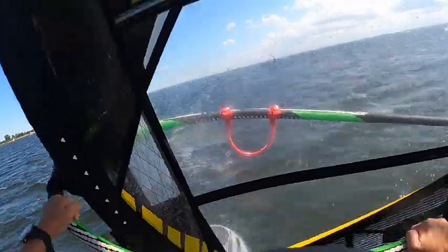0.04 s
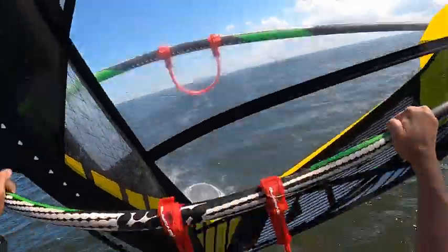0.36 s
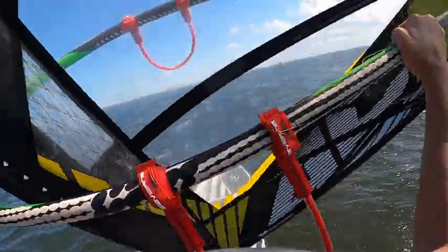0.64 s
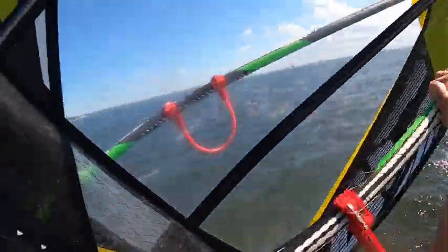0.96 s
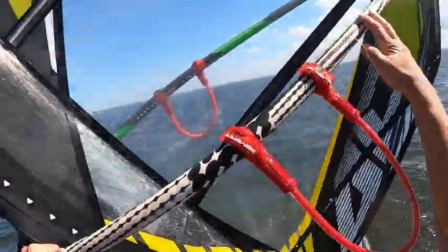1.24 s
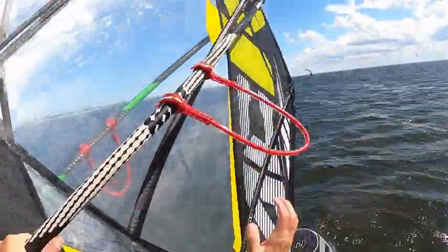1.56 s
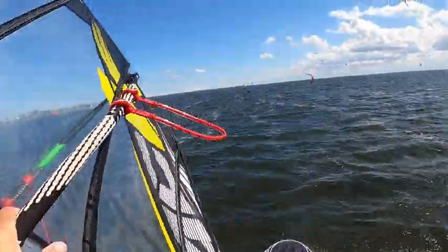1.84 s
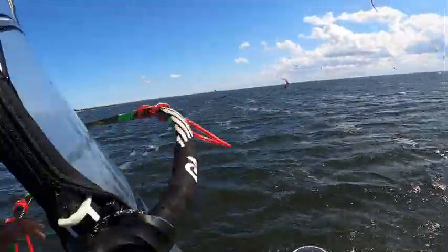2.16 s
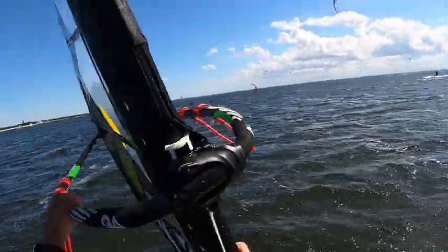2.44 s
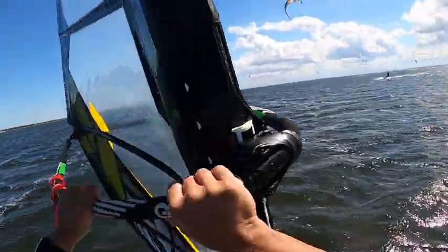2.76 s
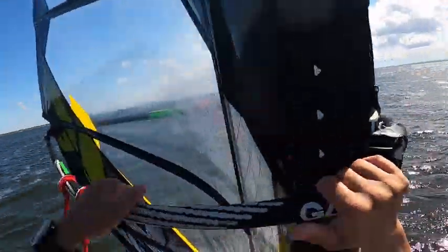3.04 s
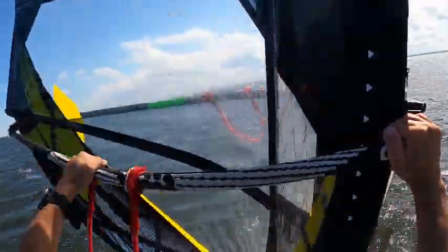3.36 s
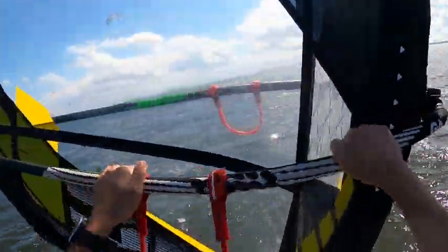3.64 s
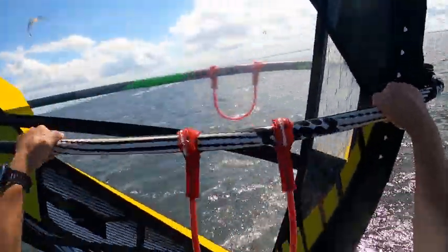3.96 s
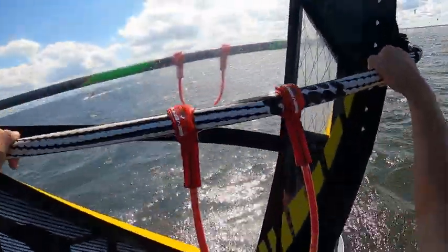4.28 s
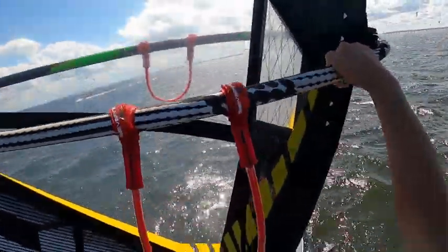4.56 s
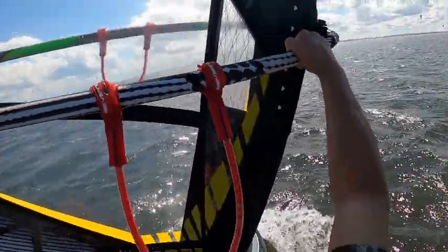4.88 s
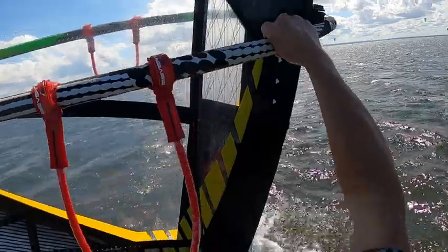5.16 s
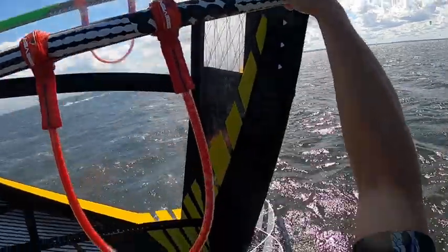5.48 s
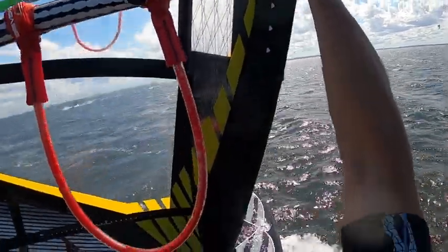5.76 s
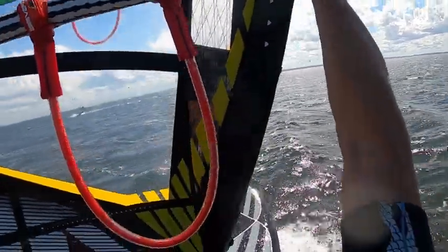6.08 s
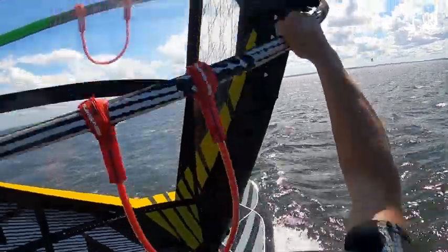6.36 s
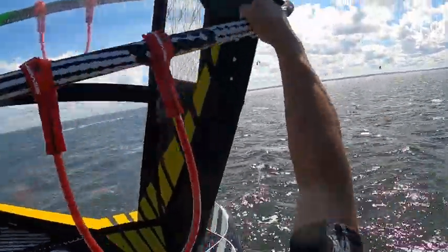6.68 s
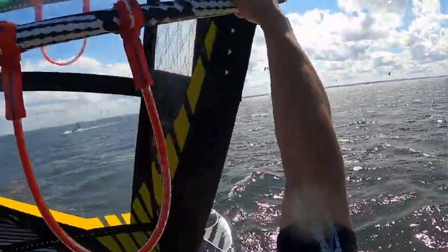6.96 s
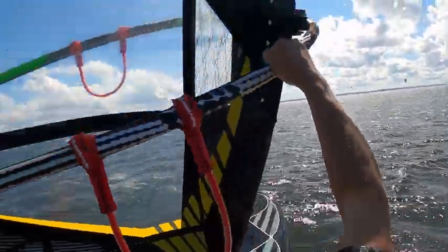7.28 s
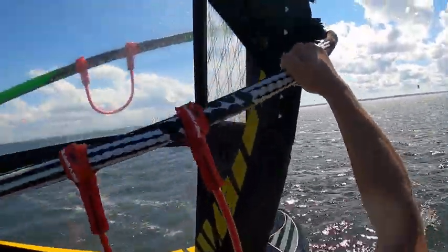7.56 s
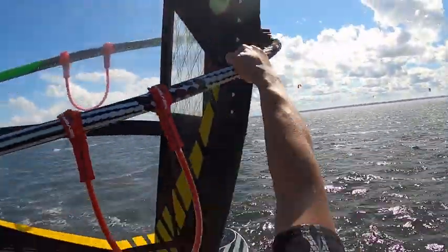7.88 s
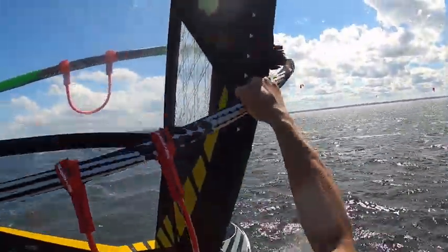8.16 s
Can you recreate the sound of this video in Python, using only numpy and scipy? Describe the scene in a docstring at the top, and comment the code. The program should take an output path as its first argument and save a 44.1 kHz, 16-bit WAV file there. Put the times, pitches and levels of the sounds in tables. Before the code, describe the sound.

Wind buffets a body-worn microphone as a windsurfer turns, with a hiss of spray, rig clacks and water washing along the board.

```python
"""Windsurfer turning in chop

Heard from a body-worn microphone. Wind buffets the port, hoots in its cavity and tears into a crackle
in the gusts. A sheet of spray hisses past in the turn while a hollow dip glides through the rush.
Water washes along the board, drops tap, the rig clacks; a limiter holds the peaks."""
import sys
import numpy as np
from scipy import signal
from scipy.fft import rfft, irfft, next_fast_len
from scipy.io import wavfile
from scipy.ndimage import uniform_filter1d, minimum_filter1d

SR = 44100
rng = np.random.default_rng(int(sys.argv[2]) if len(sys.argv) > 2 else 0)


def wav_out(sig):
    """Save sig, one row per channel (or a flat mono array), as 16-bit PCM at SR to the path in sys.argv[1]."""
    wavfile.write(sys.argv[1], SR, np.round(np.clip(np.atleast_2d(sig).T, -1, 1) * 32767).astype(np.int16))


N = 371322
TIME = np.arange(N) / SR
AGE_S = TIME[:SR // 50]  # time within one impact

# water along the board: t/s, level/dB
WASH_LEVEL = [(0, -41.5), (.6, -51.5), (1, -60), (3.3, -53.5), (4.0, -59.5), (4.6, -54.5), (5.6, -64.5),
              (6.4, -53.5), (7.4, -57), (8.42, -50.5)]
# its spectrum: f/Hz, density/dB
WASH_SPECTRUM = [(500, -8), (1200, 6.5), (2000, -3), (3000, -10), (4200, -18.5), (6000, -30.5), (7500, -43),
                 (9000, -53.5), (15000, -59)]
# passing sheet of spray: t/s, level/dB
SHEET_LEVEL = [(0.6, -70), (0.72, -50.5), (0.94, -39.5), (1.18, -40), (1.38, -34.5), (2.27, -33),
               (2.43, -50.5), (2.83, -50.5), (2.95, -62.5), (3.3, -69)]
# coarse drops relative to the sheet: t/s, level/dB
COARSE_LEVEL = [(.7, -5), (1.1, -7.5), (2.3, -5), (2.7, -10.5)]
# mist ahead of the sheet: t/s, level/dB
MIST_LEVEL = [(.36, -102), (.6, -80), (.78, -75), (.95, -65), (1.15, -69), (1.42, -60), (1.56, -75),
              (1.8, -85), (2.27, -84), (2.4, -105)]
# last spits of the sheet: t/s, length/s, level/dB
SPITS = [(3.153, 0.021, -70), (3.216, 0.016, -59)]
# fine drops: f/Hz, density/dB
HISS_SPECTRUM = [(1200, -40.5), (2400, -9), (3300, -6.5), (4000, -3), (4600, -1), (5600, -7), (6500, -3.5),
                 (7200, -10.5), (8200, -21.5), (10000, -35.5), (12000, -47), (15500, -49.5)]
# coarse drops: f/Hz, density/dB
COARSE_SPECTRUM = [(600, -6), (1000, -7), (1700, 1), (2400, -4), (3200, -4.5), (5000, -38.5), (9000, -61)]
# mist: f/Hz, density/dB
MIST_SPECTRUM = [(8000, -25), (11000, -8), (12200, 4), (13500, -5), (15500, -2.5), (17000, -24)]
# air and water popping on the port: t/s, relative peak/dB
POPS = [(0.1994, -35), (0.2795, -34), (2.354, -38), (2.368, -36), (2.381, -32), (2.394, -27), (2.407, -36),
        (2.432, -38), (3.598, -40), (3.633, -34), (3.7155, -31), (3.7385, -36), (3.7529, -32),
        (3.765, -36.5), (3.7985, -31.5), (3.931, -40), (4.131, -31), (4.140, -35), (4.1704, -27),
        (4.9603, -36.5), (5.1754, -30), (5.2044, -38), (5.242, -38.5), (5.266, -41), (5.340, -30),
        (5.3545, -27), (5.374, -38), (5.3908, -26.5), (5.434, -26), (5.482, -39.5), (5.500, -33),
        (5.509, -30), (5.543, -37), (5.557, -37), (5.580, -39), (5.6072, -33), (5.6465, -25), (5.6594, -28),
        (5.679, -38), (5.6874, -30), (5.705, -29), (5.719, -28), (5.735, -40), (5.790, -39.5),
        (5.922, -36.5), (5.932, -33), (6.028, -32.5), (6.066, -32.5), (6.5093, -33.5), (6.5153, -33),
        (6.5322, -32), (6.541, -36), (6.5696, -40), (6.6075, -33), (6.633, -29), (6.6614, -35),
        (6.6829, -28.5), (6.7068, -33), (6.726, -27), (6.7707, -32), (6.777, -36), (6.8066, -33),
        (6.8256, -36.5), (6.84, -39), (7.2223, -33), (7.2372, -28), (7.253, -36), (7.270, -38),
        (7.2951, -28.5), (7.328, -35), (7.3739, -39), (7.3989, -34), (7.4455, -36), (7.456, -30),
        (7.466, -32), (7.505, -27), (7.560, -27.5), (7.570, -29), (7.578, -34), (7.637, -33),
        (7.701, -45.5), (8.18, -33), (8.219, -37), (8.284, -31), (8.2995, -27), (8.313, -28)]
# drops on the housing: t/s, relative peak/dB
DROPS = [(1.5408, -20.5), (2.8444, -41), (3.18, -58), (3.2244, -55), (3.3094, -56)]

# rig rattles: t/s, length/s, level/dB
CLATTERS = [(2.375, 0.04, -47), (3.627, 0.03, -48.5), (3.71, 0.091, -52), (6.67, 0.08, -42.5),
            (7.518, 0.041, -42.5)]
# contacts of boom, lines and hands: t/s, relative peak/dB, ring f/Hz, ring amount/0-1
CLACKS = [(1.869, -23, 2190, 0.7), (1.8994, -18, 1850, 0.7), (1.994, -23, 1710, 0.8),
          (2.1822, -17.5, 3380, 0.93), (2.198, -26, 1600, .7), (2.329, -28, 4000, 0.9),
          (2.77, -34, 1510, 1), (3.631, -33, 1700, 0.93), (4.0188, -46, 2500, .2), (4.1902, -31, 2140, .7)]
# their crack: f/Hz, density/dB
CRACK_SPECTRUM = [(400, -9.5), (1200, 6), (2200, 3), (3600, -9.5), (4800, -20), (7000, -30.5)]
# hollow, gliding dip in the rush of wind and water: t/s, centre f/Hz, width/centre
HOLLOW_BAND = [(.55, 2820, .21), (.9, 1550, 0.32), (1.1, 1290, 0.23), (1.55, 1120, 0.25), (2.2, 950, 0.2),
               (2.55, 1550, 0.27), (2.74, 2150, 0.31), (3.0, 3200, 0.25), (7.2, 520, 0.87)]
# depth of that dip: t/s, depth/0-1
HOLLOW_DEPTH = [(.55, 0), (1.08, 0.96), (2.32, 0.43), (2.45, 0.2), (2.66, 0.5), (2.76, 0.9), (3.3, 0),
                (7.262, 0.05), (7.274, 0.76), (7.303, 1), (7.314, 0.15)]

# grazing air rings the cavity: t/s, length/s, start f/Hz, end f/Hz, level/dB
HOOTS = [(0, 1.3, 604, 600.3, -36), (3.893, .23, 678, 544, -27), (4.905, 0.22, 630, 588.3, -32.5),
         (5.842, 0.3, 597.5, 609, -32.5), (6.212, 0.24, 575, 651, -29), (7.042, 0.12, 608, 623, -35.5),
         (7.729, 0.17, 621.8, 590, -33), (7.951, 0.15, 564, 620, -26.5)]
# whoops, low swells, short knocks: t/s, length/s, start f/Hz, end f/Hz, level/dB, roughness (max 1 used)
WHOOPS = [(.05, 0.12, 212, 170, -20, 1.2), (.12, 0.35, 43.6, 38, -21, 0.85),
          (0.54, .028, 1850, 1510, -37.5, 0.8), (0.702, .022, 1500, 1580, -42, .7),
          (0.876, 0.3, 102.8, 158, -16, 0.5), (1.141, 0.094, 445.5, 255, -12, 0.5),
          (1.272, 0.022, 1150, 1170, -41, 0.93), (1.401, 0.069, 402, 301, -16, 1.14),
          (1.434, 0.02, 1010, 1050, -32, 1.1), (1.485, 0.12, 166.7, 189, -19, 0.98),
          (1.641, 0.036, 1050, 960, -32, 1.1), (1.76, 0.019, 1000, 970, -25.5, 0.9),
          (1.798, 0.011, 1130, 1090, -28, 0.7), (2.332, 0.014, 940, 1050, -18, 0.6),
          (2.352, 0.026, 790, 1120, -15, 0.75), (2.355, 0.07, 796, 657, -28, 0.9),
          (2.383, 0.0216, 537, 410, -11, 1.17), (2.404, .09, 1500, 1213, -38.5, 1),
          (2.464, 0.14, 1250, 958, -37, 0.8), (3.929, 0.0075, 1013, 940, -26, 0.5),
          (4.719, 0.28, 125, 190, -25, 1.12), (5.38, 0.167, 135.8, 164.6, -21.5, 1.1),
          (6.47, .14, 200.1, 172.2, -16, 1), (7.2, 0.087, 179, 150.5, -16.5, 1),
          (7.224, 0.0496, 481, 403, -22.5, 0.9), (7.271, 0.037, 992, 1370, -32, .7),
          (7.303, 0.023, 1114, 595, -27, .9), (7.331, 0.034, 627, 397, -19.5, 0.98),
          (7.582, 0.069, 998, 612, -23, 0.75), (7.623, 0.036, 1308, 767, -28, 0.5)]
# dull thumps in the wind noise: t/s, peak/dB, f/Hz
THUMPS = [(.030, -21, 900), (.254, -15, 650), (3.099, -21, 484), (3.458, -11.5, 476), (3.497, -19, 412),
          (3.91, -13, 468), (3.973, -14, 592), (4.035, -14, 573), (4.125, -11, 495), (4.189, -16, 520),
          (4.956, -12, 506), (5.044, -13, 568), (5.176, -19, 620), (5.59, -14.5, 711), (6.282, -13.5, 581),
          (6.38, -19, 638), (6.49, -11, 554), (7.31, -13, 676), (7.321, -7, 404), (8.008, -16, 606),
          (8.036, -25, 635)]
# gusts on the port: t/s, length/s, added exposure/dB, crackle level/dB
GUSTS = [(0.035, 0.087, 5.5, -67), (2.248, 0.076, 6.5, -58), (2.346, 0.033, 7.5, -51),
         (3.676, 0.21, 0.5, -51), (4.096, 0.11, 15.5, -55), (5.135, 0.15, 5, -42.5),
         (5.315, 0.24, 6, -41.5), (5.626, 0.11, 6, -48.5), (5.881, 0.07, 4.5, -54), (6.008, 0.15, 9, -55.5),
         (6.49, 0.144, 12.5, -57), (6.647, 0.078, 9.5, -40), (6.753, 0.064, 11.5, -57),
         (7.204, 0.13, 13.5, -40.5), (7.345, 0.11, 12, -47), (7.475, 0.2, 12.5, -58), (8.076, 0.22, 6, -54),
         (8.21, 0.25, 9, -49)]
# port in shelter: t/s, length/s, depth/dB
LULLS = [(0.167, 0.025, 2.5), (1.331, 0.04, 3.5), (1.599, 0.05, 4.5), (2.443, 0.077, 7), (3.224, 0.055, 5),
         (3.814, 0.054, 3), (4.232, 0.035, 0), (5.563, 0.025, 3), (6.313, .04, 3), (6.864, 0.29, 6),
         (7.27, 0.02, 0.5), (7.863, .06, 2.5)]
# wind strength at the body: t/s, level/dB
WIND_LEVEL = [(0, 0.5), (.45, 1), (.76, -7), (1.02, 0), (1.52, 2), (1.72, -2.5), (2.15, -3), (2.35, 0.5),
              (3.0, 0), (3.6, 0), (4.45, 0), (4.9, 4.5), (5.45, -0.5), (6.05, 2.5), (6.36, -3), (6.56, 1.5),
              (7.25, -1), (7.5, -1), (7.9, -1.5), (8.15, 3), (8.42, 2)]
# how squarely the port faces the flow: t/s, exposure/dB
FACING = [(0, 2.5), (1.2, 1), (1.68, -4.5), (1.95, 1), (2.9, -2.5), (3.75, 0.5), (4.02, -16.5), (4.35, -6),
          (4.65, -15.5), (5.2, -1), (5.85, 1.5), (6.3, -8), (6.9, -3.5), (7.78, -9.5), (8.1, -1.5),
          (8.42, -1.5)]
# deep rumble: t/s, level/dB
RUMBLE_LEVEL = [(0, -27), (.3, -28), (.78, -29), (.96, -22.5), (1.5, -22.5), (2.15, -20), (2.5, -22.5),
                (2.7, -25), (3.7, -19), (5.2, -24.5), (5.9, -19), (6.5, -21.5), (7.1, -23), (8.42, -24)]
# largest eddies: f/Hz, density/dB
RUMBLE_SPECTRUM = [(10, -15.5), (22, 5), (40, 3), (75, 9), (100, 1.5), (125, -6), (180, -35.5),
                   (400, -87.5), (2000, -130)]
# low buffeting: f/Hz, density/dB
BUFFET_SPECTRUM = [(60, -36), (100, -3), (125, -4.5), (200, -6.5), (270, -9.5), (380, -16), (700, -43),
                   (5000, -120)]
# midrange roar: f/Hz, density/dB
ROAR_SPECTRUM = [(150, -22.5), (280, 1), (350, 1), (500, 1.5), (680, -4.5), (850, -13), (1200, -46),
                 (2000, -61), (8000, -110)]
# flow breaking off the housing: f/Hz, density/dB
TEARING_SPECTRUM = [(300, -4), (550, 3), (750, 8.5), (950, 6), (1200, -2.5), (1500, -13.5), (2000, -24),
                    (3000, -46.5), (4000, -58.5), (8000, -100)]
# snaps at the port: f/Hz, density/dB
CRACKLE_SPECTRUM = [(600, -8.5), (1100, -1.5), (1500, 4.5), (2000, -8.5), (2800, -16.5), (3600, -25.5),
                    (4500, -42), (6000, -52.5), (10000, -90)]


def from_db(db):
    """Decibels to gain."""
    return 10 ** (np.asarray(db) / 20)


def unit_rms(x):
    """Scale to unit power."""
    return x / np.sqrt(np.mean(x ** 2) + 1e-20)


def curve(rows, at_s=TIME):
    """Interpolate (t/s, value) rows."""
    return np.interp(at_s, *np.transpose(rows))


def swell(start_s, length_s, attack_s, release_s):
    """Trapezoid envelope; the release follows the length."""
    rise = np.clip((TIME - start_s) / attack_s, 0, 1)
    fall = np.clip(1 - (TIME - start_s - length_s) / release_s, 0, 1)
    return rise * fall


def lowpass(x, hz, order):
    """Butterworth low-pass."""
    return signal.sosfilt(signal.butter(order, hz, fs=SR, output="sos"), x)


def resonance(x, hz, width_hz):
    """Two-pole resonance, unity peak gain."""
    r = np.exp(-np.pi * width_hz / SR)
    feedback = [1, -2 * r * np.cos(2 * np.pi * hz / SR), r * r]
    return signal.lfilter(np.array([1, 0, -1]) * (1 - r * r) / 2, feedback, x)


def coloured(x, spectrum):
    """Impose a spectrum; rms 1."""
    hz, db = np.transpose(spectrum)
    size = next_fast_len(N)
    bins_hz = np.maximum(np.arange(size // 2 + 1) * SR / size, 1)
    gain = from_db(np.interp(np.log(bins_hz), np.log(hz), db)) * (bins_hz > 10)
    return unit_rms(irfft(rfft(x, size) * gain, size)[:N])


def drift(rate_hz):
    """Slow random control, rms 1."""
    step, settle = 20, 4000
    r = np.exp(-2 * np.pi * rate_hz * step / SR)
    noise = rng.standard_normal(N // step + settle + 2)
    slow = signal.lfilter([1], [1, -2 * r, r * r], noise)[settle:]
    return np.interp(np.arange(N) / step, np.arange(len(slow)), unit_rms(slow))


def waver(width_hz, size):
    """Random complex envelope of a rough tone; unit power."""
    slow = lowpass(rng.standard_normal((2, size + SR // 4)), width_hz, order=2)[:, -size:]
    return unit_rms(slow).T @ [1, 1j] / np.sqrt(2)


def evened(x, window_s):
    """Hold the running rms at 1; quicker lumps remain."""
    return x / np.sqrt(uniform_filter1d(x ** 2, int(window_s * SR)) + 1e-9)


def turbulence(spectrum, lumps_db, window_s):
    """Lumpy pressure noise."""
    return evened(coloured(rng.standard_normal(N) * from_db(lumps_db), spectrum), window_s)


def grains(per_s, spread_db):
    """Tiny random impacts, mostly small, a few large."""
    sizes = from_db(spread_db * np.minimum(rng.exponential(1, N), 4)) * rng.choice([-1, 1], N)
    return sizes * (rng.random(N) < per_s / SR)


def strikes(events, shapes):
    """Place each shape at its event's time and peak level."""
    out = np.zeros(N)
    for (start_s, peak_db, *_), shape in zip(events, shapes):
        at = int(start_s * SR)
        out[at:at + len(shape)] += from_db(peak_db) * shape / np.abs(shape).max()
    return out


def wash():
    """Chop fizzes dully along the board."""
    level_db = curve(WASH_LEVEL) + drift(20)
    return from_db(level_db) * coloured(grains(per_s=11000, spread_db=3), WASH_SPECTRUM)


def spray(coarse_lag_s=0.092):
    """A sheet of droplets: mist sizzles ahead, fine drops hiss, coarse ones patter behind."""
    sheet = from_db(curve(SHEET_LEVEL))
    coarse_db = curve(COARSE_LEVEL) + curve(SHEET_LEVEL, TIME - coarse_lag_s)
    spits = sum(from_db(db) * swell(start_s, length_s, attack_s=0.004, release_s=0.016)
                for start_s, length_s, db in SPITS)
    airborne = swell(start_s=0.56, length_s=2.745, attack_s=0.08, release_s=0.02)
    flutter = from_db(0.7 * drift(31) + 0.9 * drift(200))
    hiss = (sheet + spits) * coloured(grains(per_s=9200, spread_db=2.5), HISS_SPECTRUM)
    coarse = from_db(coarse_db) * coloured(grains(per_s=8700, spread_db=3.5), COARSE_SPECTRUM)
    mist = from_db(curve(MIST_LEVEL)) * coloured(rng.standard_normal(N), MIST_SPECTRUM)
    return flutter * (airborne * (hiss + coarse) + mist)


def taps(tail_s=0.002, pop_gain_db=5, drop_gain_db=1.5):
    """Water slaps the port with a ragged tail; drops tick brightly on the housing."""
    impulse = signal.unit_impulse(len(AGE_S))
    tails = 0.34 * rng.standard_normal((len(POPS), len(AGE_S))) * np.exp(-AGE_S / tail_s)
    pops = resonance(lowpass(impulse + tails, hz=2450, order=5), hz=1320, width_hz=300)
    tick = resonance(resonance(impulse, hz=6240, width_hz=240), hz=4700, width_hz=1700)
    ticks = [tick] * len(DROPS)
    return from_db(pop_gain_db) * strikes(POPS, pops) + from_db(drop_gain_db) * strikes(DROPS, ticks)


def clatters():
    """Boom and sailcloth rattle in three damped resonances."""
    envelope = sum(from_db(db) * np.sin(np.pi * np.clip((TIME - start_s) / length_s, 0, 1))
                   for start_s, length_s, db in CLATTERS)
    contacts = grains(per_s=770, spread_db=2)
    body = (resonance(contacts, hz=1640, width_hz=120)
            - 0.46 * resonance(contacts, hz=2010, width_hz=380)
            + 0.15 * resonance(contacts, hz=2960, width_hz=1000))
    return envelope * unit_rms(lowpass(body, hz=3600, order=4))


def clacks(crack_s=0.0022, ring_s=0.0016, gain_db=3):
    """Hard contacts on the rig: a dry crack and a very short ring."""
    noise = coloured(rng.standard_normal(N), CRACK_SPECTRUM)
    cracks = noise[:len(CLACKS) * len(AGE_S)].reshape(len(CLACKS), -1) * np.exp(-AGE_S / crack_s)
    shapes = []
    for crack, (_, _, hz, amount) in zip(cracks, CLACKS):
        ring = np.sin(2 * np.pi * hz * AGE_S) * np.exp(-AGE_S / ring_s)
        shapes.append((1 - 0.5 * amount) * crack + amount * ring)
    return from_db(gain_db) * strikes(CLACKS, lowpass(shapes, hz=4400, order=6))


def hoot(width_hz=52, floor_db=-42.5):
    """Grazing air rings the port's cavity in fits; the pitch slides with the angle."""
    envelope = from_db(floor_db)
    glide = []
    for start_s, length_s, start_hz, end_hz, db in HOOTS:
        fit = from_db(db) * swell(start_s, length_s, attack_s=0.013, release_s=0.058)
        envelope = np.maximum(envelope, fit)
        glide += [(start_s, start_hz), (start_s + length_s, end_hz)]
    hz = curve(sorted(glide))
    cavity = (waver(width_hz, N) * np.exp(2j * np.pi * np.cumsum(hz) / SR)).real
    return envelope * from_db(3.9 * drift(30)) * evened(cavity, window_s=0.05)


def crackle(gust_gain, bursts, calm_db=-65):
    """Bursts snap off the port in clusters of pops, faint between gusts."""
    snaps = grains(per_s=600, spread_db=1.5) * from_db(4 * bursts)
    envelope = (gust_gain + from_db(calm_db)) * from_db(1.2 * drift(20))
    return envelope * evened(coloured(snaps, CRACKLE_SPECTRUM), window_s=0.086)


def whoops():
    """Rough gliding whoops and low swells of wind, with short splashes or knocks."""
    out = np.zeros(N)
    for start_s, length_s, start_hz, end_hz, db, roughness in WHOOPS:
        progress = np.linspace(0, 1, int(length_s * SR))
        hz = start_hz + (end_hz - start_hz) * progress
        roughness = min(roughness, 1)
        wobble = np.sqrt(1 - roughness ** 2) + roughness * waver(0.1 * start_hz, len(hz))
        whoop = (wobble * np.exp(2j * np.pi * np.cumsum(hz) / SR)).real
        envelope = np.tanh(3 * np.sin(np.pi * progress) ** 2)
        at = int(start_s * SR)
        out[at:at + len(hz)] += from_db(db) * envelope * whoop
    return out


def thumps(decay_s=0.0019):
    """Brief dull thumps, the loudest peaks of the wind noise; a cycle or two each."""
    rings = [np.sin(2 * np.pi * hz * AGE_S) * np.exp(-AGE_S / decay_s) for _, _, hz in THUMPS]
    return strikes(THUMPS, lowpass(rings, hz=1000, order=6))


def hollowed(rush):
    """A hollow dip glides down through the rush and back, and returns briefly in one gust."""
    hz, frame_s, frames = signal.stft(rush, SR, nperseg=1024)
    knot_s, centre_hz, width = np.transpose(HOLLOW_BAND)
    log_ratio = np.log((hz[:, None] + 1) / np.interp(frame_s, knot_s, centre_hz))
    offset = log_ratio / np.interp(frame_s, knot_s, width)
    gain = 1 - curve(HOLLOW_DEPTH, frame_s) * np.exp(-2 * offset ** 2)
    return signal.istft(frames * gain, SR)[1][:N]


def gusts():
    """Gusts strike the port: added exposure/dB and crackle gain."""
    gust_db = crackle_gain = 0
    for start_s, length_s, added_db, crackle_db in GUSTS:
        envelope = swell(start_s, length_s, attack_s=0.018, release_s=0.044)
        gust_db = np.maximum(gust_db, envelope * added_db)
        crackle_gain = np.maximum(crackle_gain, envelope * from_db(crackle_db))
    return gust_db, crackle_gain


def shelter_db(edge_s=0.016):
    """Level lost while the port is sheltered."""
    return sum(db * swell(start_s, length_s, edge_s, edge_s) for start_s, length_s, db in LULLS)


def wind(gust_db, bursts):
    """Large eddies rumble; small ones ride on them in bursts and tear at the port."""
    strength_db = curve(WIND_LEVEL)
    exposure_db = curve(FACING) + gust_db
    unsteady_db = 0.8 * drift(14) - shelter_db()
    rumble_db = curve(RUMBLE_LEVEL) + unsteady_db + 1.4 * drift(28)
    buffet_db = -21 + strength_db + 0.1 * gust_db + unsteady_db
    roar_db = -25 + 0.8 * strength_db + 0.33 * exposure_db + 1.1 * unsteady_db
    tearing_db = -32 + exposure_db + 1.2 * unsteady_db
    rumble = from_db(rumble_db) * turbulence(RUMBLE_SPECTRUM, lumps_db=0, window_s=0.1)
    buffet = from_db(buffet_db) * turbulence(BUFFET_SPECTRUM, lumps_db=bursts, window_s=0.098)
    roar = from_db(roar_db) * turbulence(ROAR_SPECTRUM, lumps_db=1.6 * bursts, window_s=0.066)
    # strong flow leaves the housing in separate puffs
    breakaway = np.clip((tearing_db + 48) / 14, 0.2, 1)
    puffs = grains(per_s=2600, spread_db=1) * from_db(1.9 * breakaway * bursts)
    tearing = from_db(tearing_db) * evened(coloured(puffs, TEARING_SPECTRUM), window_s=0.069)
    return rumble + buffet + roar + tearing


def scene():
    """Mono sum at the microphone."""
    gust_db, crackle_gain = gusts()
    bursts = drift(77)
    rush = hollowed(wind(gust_db, bursts) + spray() + wash())
    port_air = crackle(crackle_gain, bursts) + hoot()
    return (rush + port_air + whoops() + clatters() + clacks() + thumps() + taps())[None]


def record(dry, ceiling=0.56, hold_s=0.0044, fade_s=0.008, cutoff_hz=15750):
    """Look-ahead limiter, end fades, steep low-pass."""
    span = int(hold_s * SR)
    gain = minimum_filter1d(np.minimum(1, ceiling / (np.abs(dry) + 1e-9)), span)
    gain = uniform_filter1d(uniform_filter1d(gain, span // 2), span // 2)
    fade = np.clip(np.minimum(TIME, TIME[-1] - TIME) / fade_s, 0, 1)
    top_cut = signal.ellip(10, 0.1, 80, cutoff_hz, fs=SR, output="sos")
    return signal.sosfilt(top_cut, dry * gain * fade)


dry = scene()
out = record(dry)
wav_out(out)
```